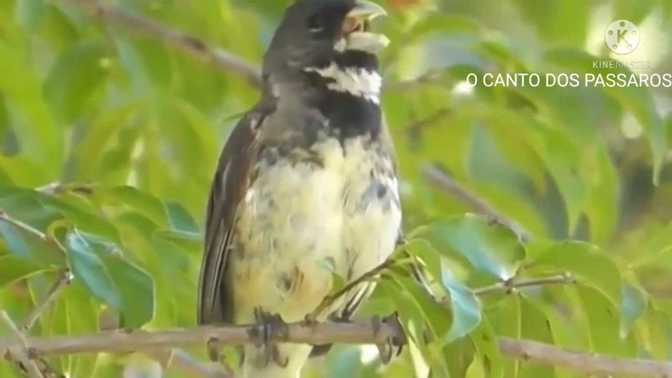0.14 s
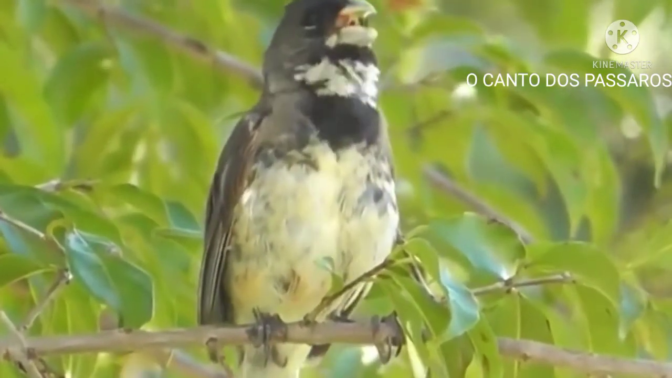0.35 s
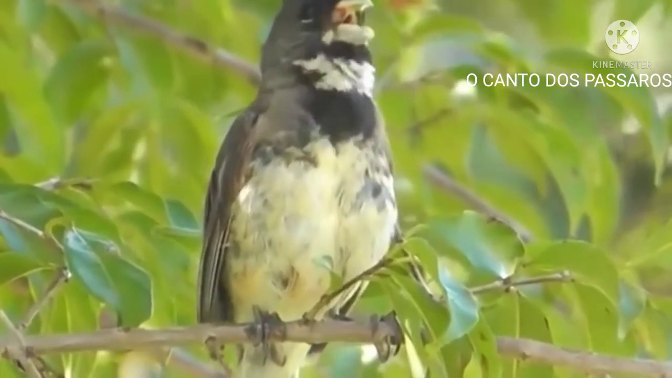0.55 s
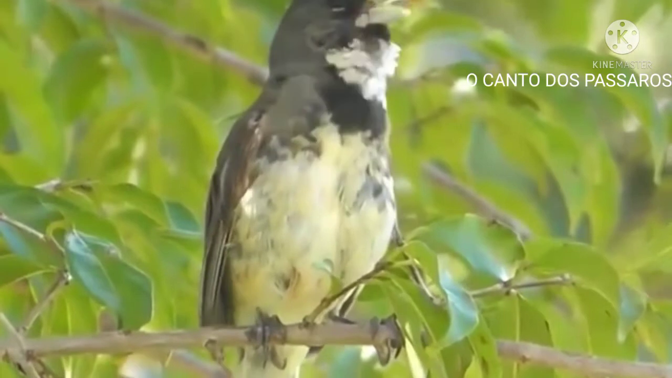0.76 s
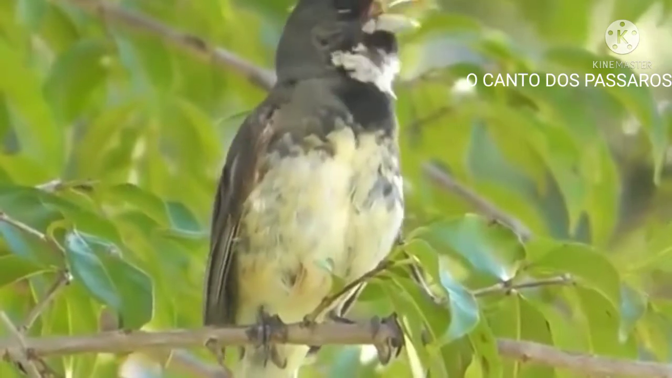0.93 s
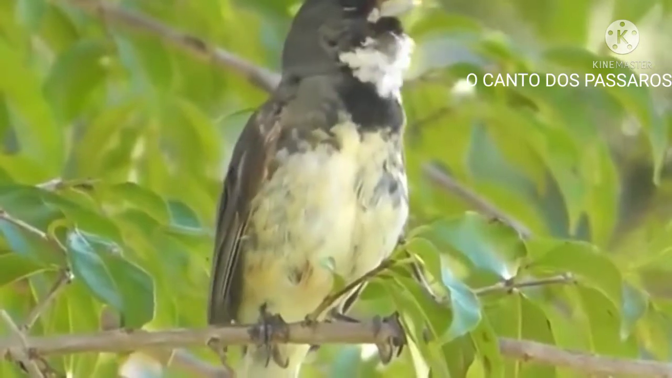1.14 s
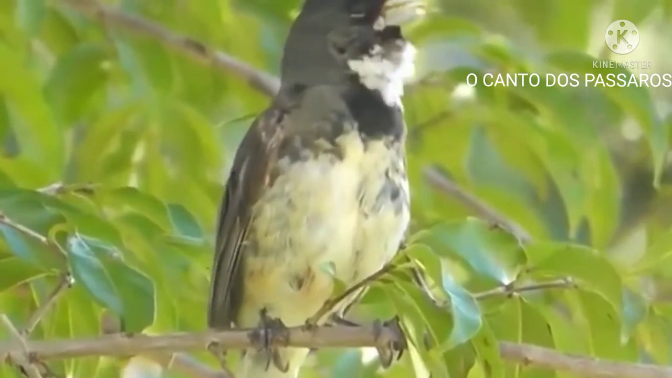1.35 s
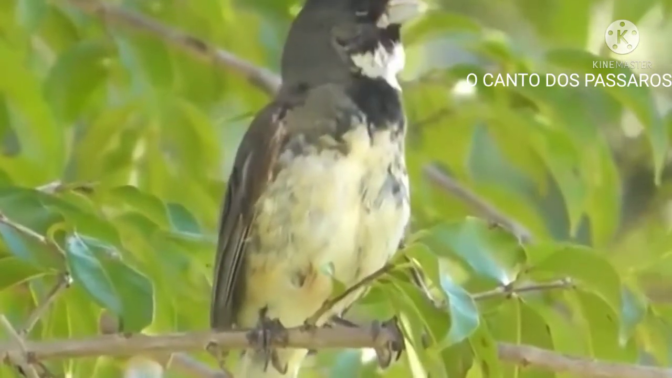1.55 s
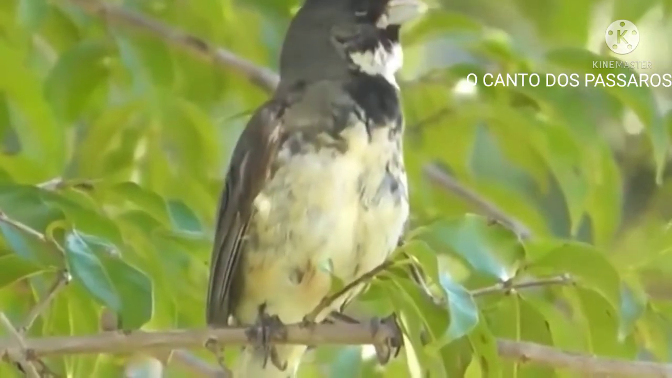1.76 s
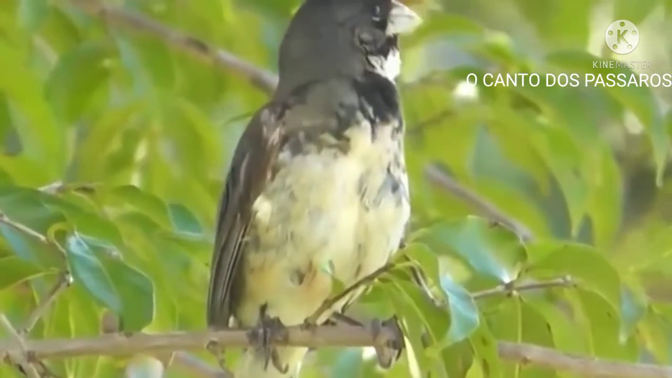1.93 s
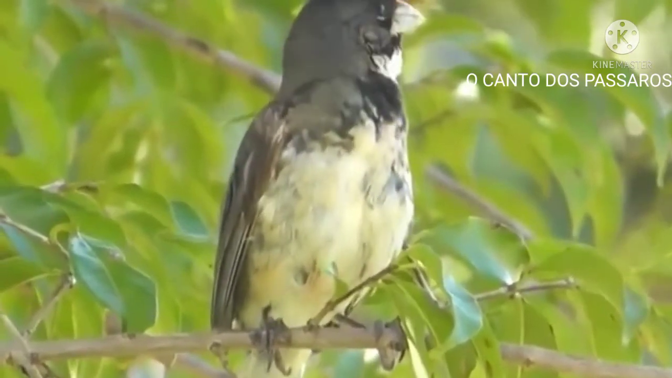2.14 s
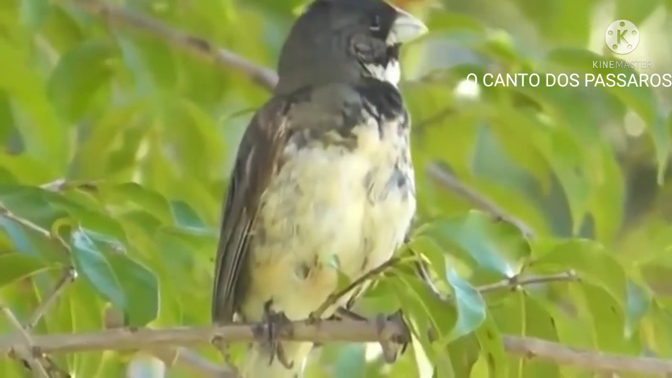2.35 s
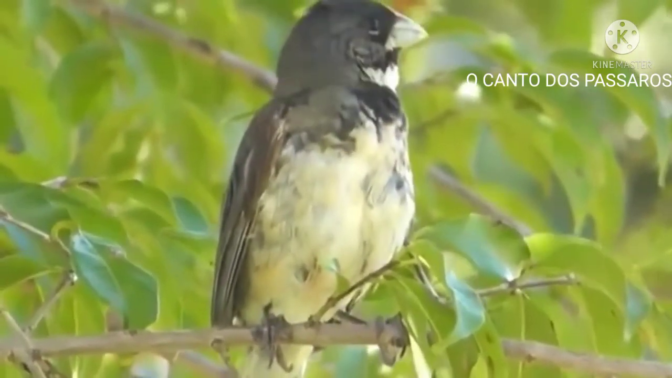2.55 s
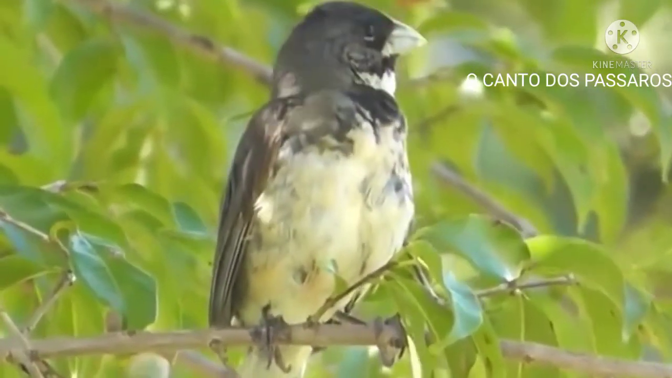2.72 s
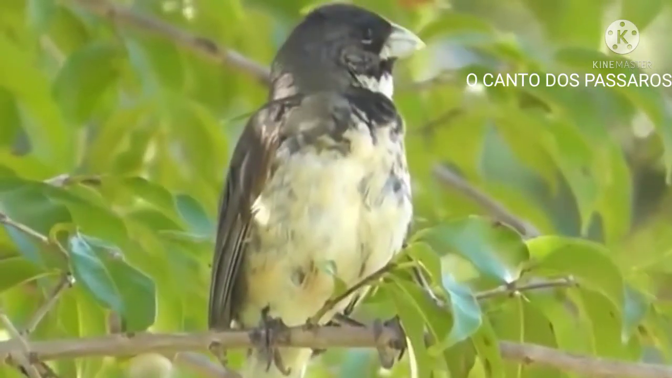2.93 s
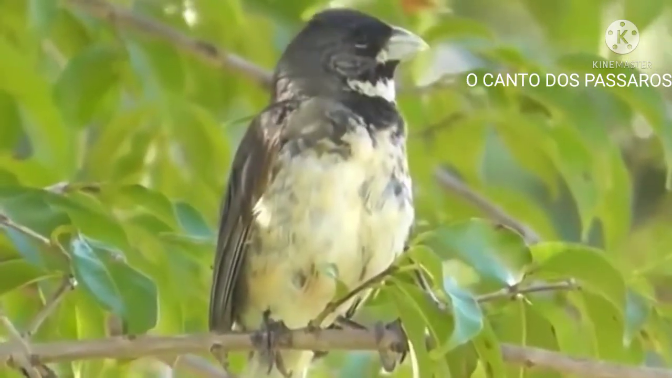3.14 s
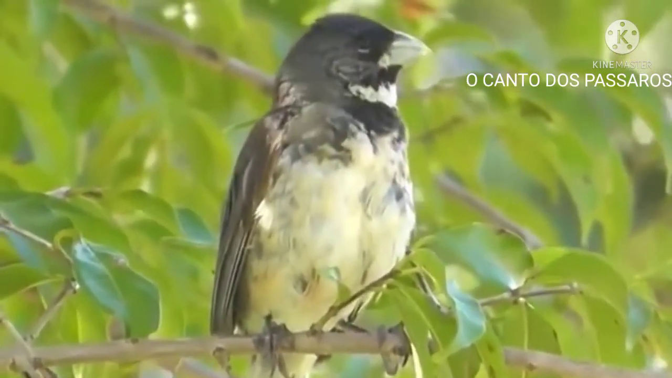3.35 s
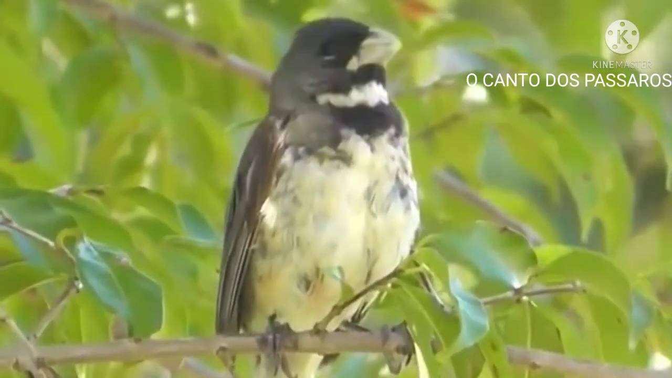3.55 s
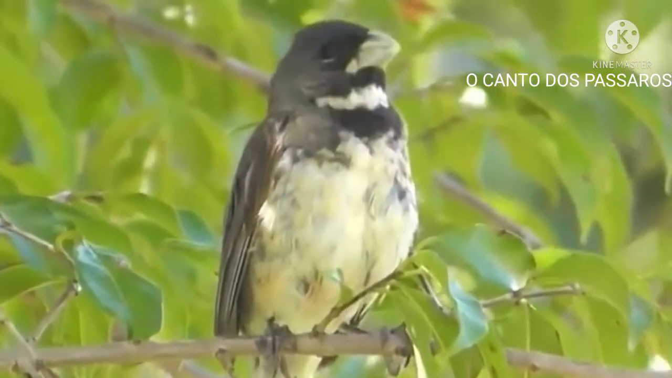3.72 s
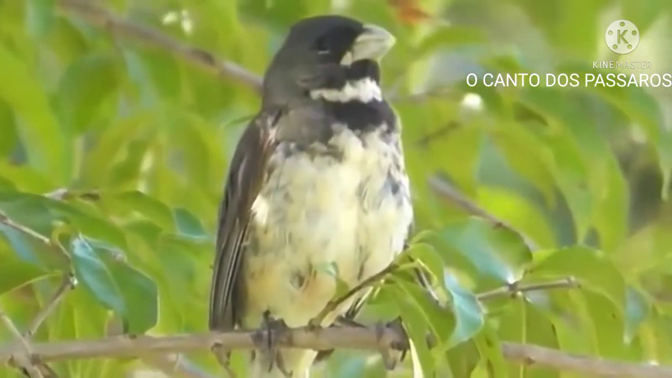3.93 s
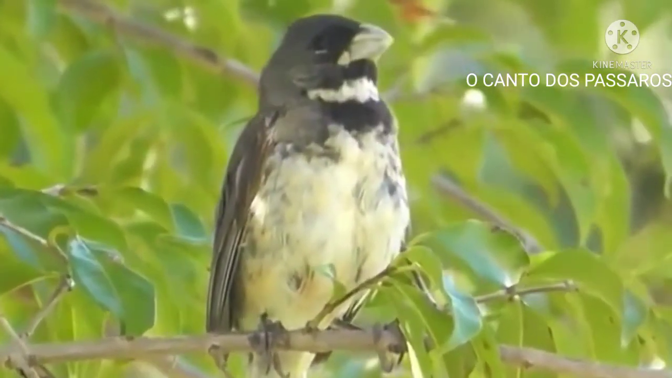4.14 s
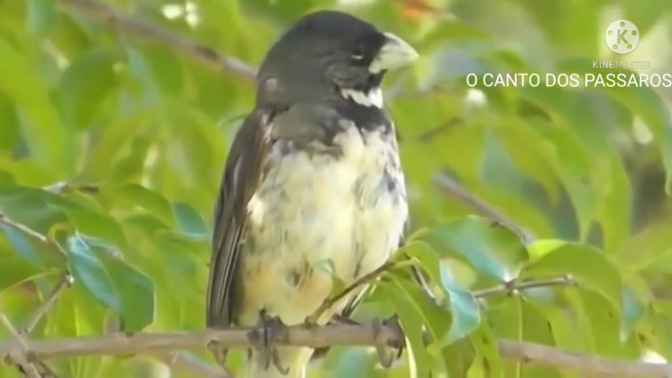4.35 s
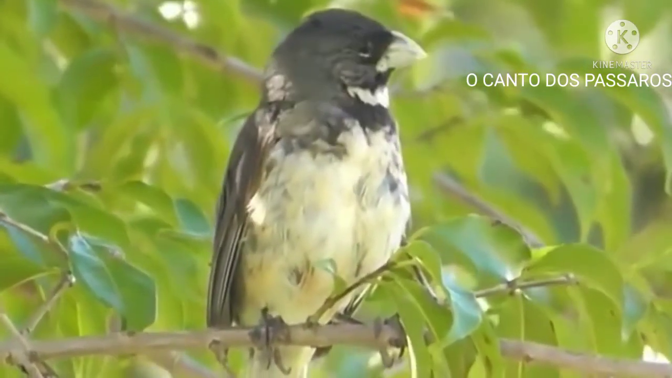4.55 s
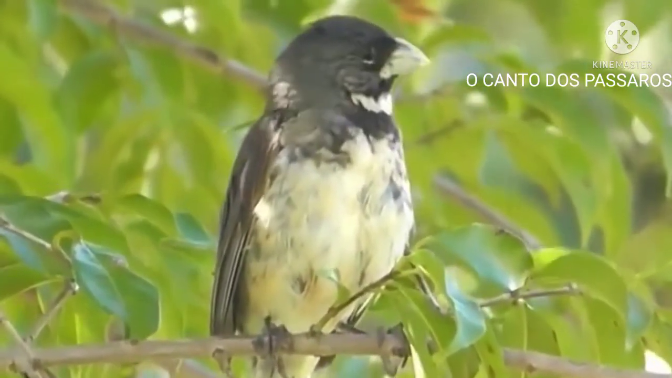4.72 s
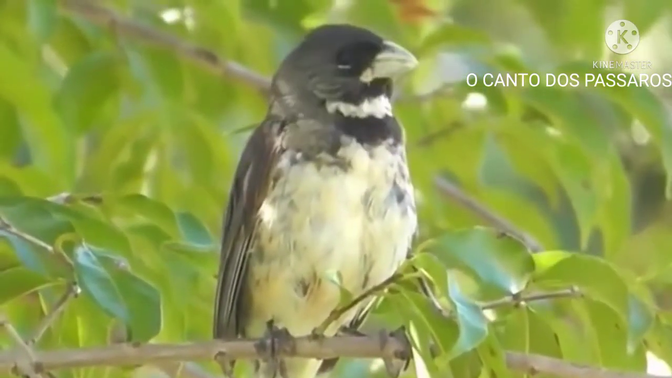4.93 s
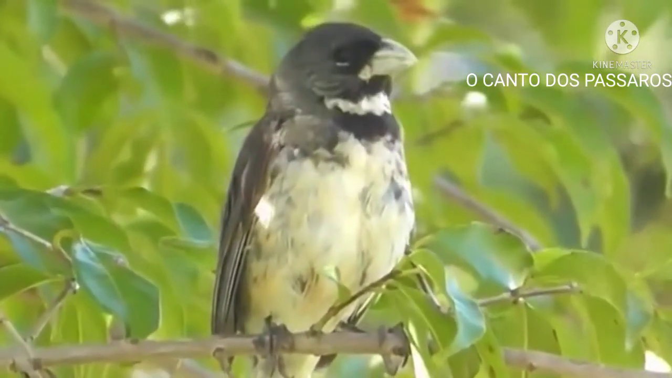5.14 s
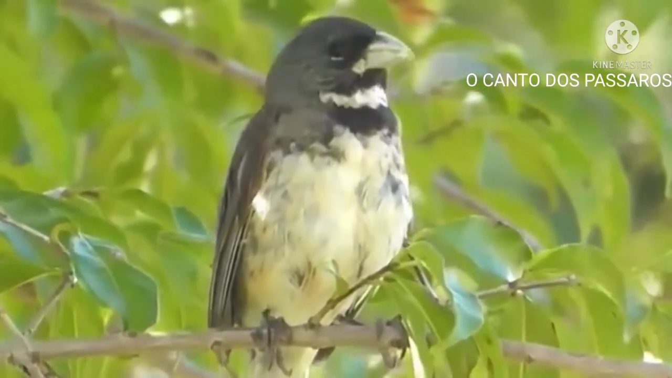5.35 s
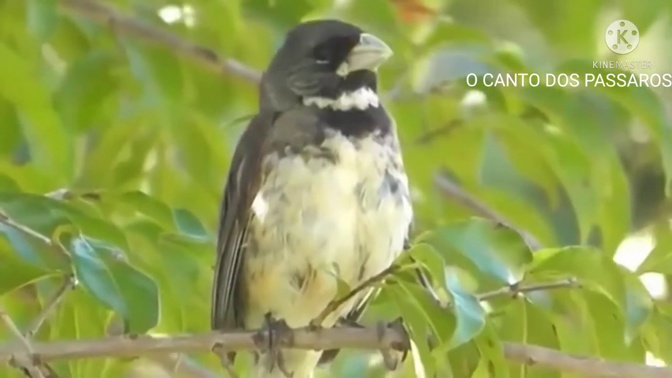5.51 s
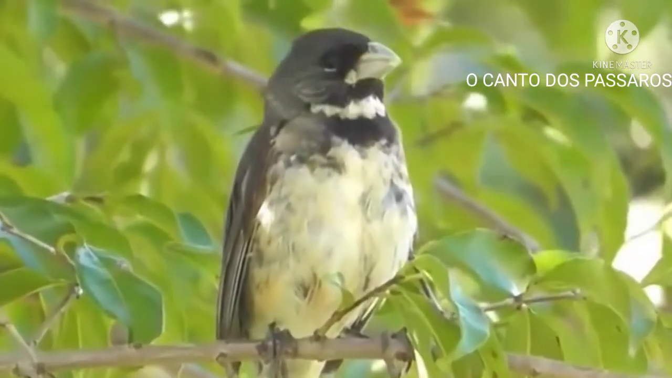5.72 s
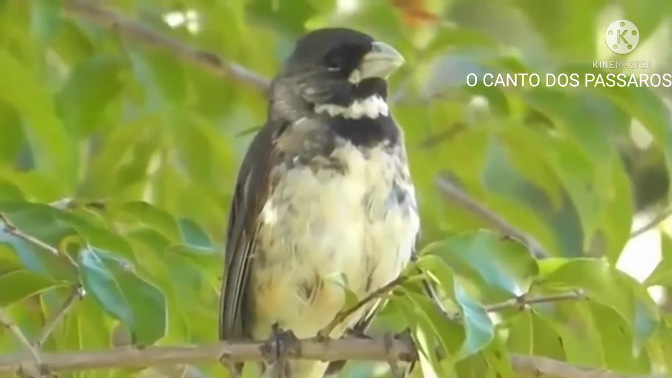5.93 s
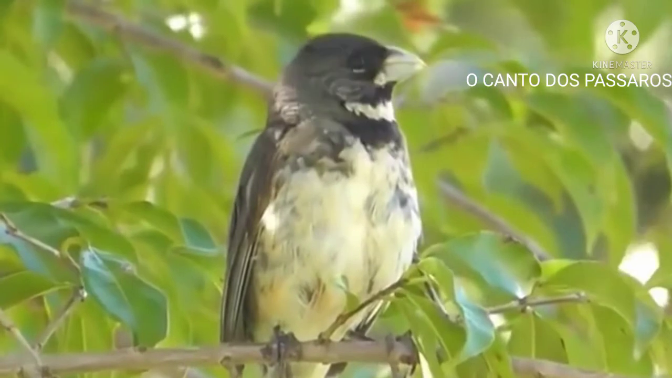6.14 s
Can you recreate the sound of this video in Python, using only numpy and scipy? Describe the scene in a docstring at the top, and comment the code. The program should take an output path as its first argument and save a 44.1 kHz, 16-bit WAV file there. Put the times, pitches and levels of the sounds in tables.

```python
"""A small finch close to the microphone ends a song phrase of gliding whistles and short buzzes, loud enough to
overload the recorder. The whistles are near sines; the buzzes are tones shaken in level and phase. Other birds
whistle, rasp and chirp farther off in the same ways, and one swoops down with its octave; hoarse haze also
lingers after some of the near notes. Leaves and distant traffic hiss and rumble, and wind gusts rumble on the
microphone: all shaped noise."""
import sys
import numpy as np
from scipy import signal
from scipy.fft import rfft, irfft
from scipy.io import wavfile
from scipy.ndimage import uniform_filter1d

SR = 44100
rng = np.random.default_rng(int(sys.argv[2]) if len(sys.argv) > 2 else 0)


def dump(signal):
    """Clip the signal to [-1, 1] and save it as 16-bit WAV at the path in sys.argv[1]."""
    limited = np.clip(np.atleast_2d(signal).T, -1, 1)
    pcm = np.round(limited * 32767).astype(np.int16)
    wavfile.write(sys.argv[1], SR, pcm)


N = 276948  # length [samples]

# Whistled notes of the near bird: (start [s], length [ms], pitch at start, quarter, middle, three quarters
# and end [Hz each], level at the start [dB], change over the note [dB], attack [ms], release [ms])
NEAR_NOTES = [(0, 72.3, 5030, 4770, 4648, 4615, 4580, -2.5, -0.5, 0.067, 12),
              (0.072, 53, 2240, 2625, 3360, 3900, 4500, -47.5, 20.5, 3.9, 3),
              (0.12, 30, 5300, 5660, 5630, 5670, 5840, -26, -2.5, 2.5, 3),
              (0.13, 74, 3550, 3785, 4034, 4370, 4730, 6.5, -15, 40, 4),
              (0.19, 90.6, 4665, 4840, 4717, 4640, 4720, -6, 6.5, 8, 7),
              (0.345, 126.5, 8130, 7590, 6590, 5660, 5260, -4, 3, 49.4, 6),
              (0.511, 30.3, 8000, 6770, 6400, 6200, 5750, -1, -13, 7.1, 4),
              (0.532, 110.6, 5680, 5066, 4758, 4452, 4260, -7, 4, 18, 13),
              (0.644, 62, 5660, 6080, 6300, 6940, 6800, -11.5, 6, 6, 11),
              (0.75, 184.5, 8370, 5660, 4700, 4203, 3990, -4, 1.5, 21, 22),
              (0.99, 42, 4140, 4100, 4320, 4400, 4700, -19, -17, 11, 3),
              (1.0, 38, 2000, 2110, 2330, 2430, 2470, -40, 13.5, 4, 8),
              (1.03, 22, 3980, 4090, 4500, 4580, 4600, -14, 4, 7, 2),
              (1.046, 76, 4010, 3830, 3390, 3060, 2600, -1.5, -21, 8, 14),
              (1.154, 22.6, 4900, 5160, 5200, 4530, 4200, -14.5, 9.5, 7, 6),
              (1.178, 55.6, 4950, 5800, 6006, 6120, 6020, -1.5, -5, 5.3, 20),
              (1.251, 80, 3940, 3707, 3275, 2955, 2600, -3, -20, 3.2, 13),
              (1.368, 13.5, 5380, 5740, 5370, 5200, 4850, -4, -19, 4.1, 2),
              (1.4, 22, 2510, 3090, 3440, 3640, 3900, -10, -5.5, 10.3, 5),
              (1.421, 47.3, 2970, 3130, 2974, 2980, 2830, -18, 4.5, 5.9, 6),
              (1.462, 34.4, 4270, 4140, 4164, 3840, 3270, -7, -5, 18, 4),
              (1.534, 15, 5330, 5700, 5780, 6100, 6100, -7.5, -16, 2.9, 2),
              (1.549, 15.4, 5180, 5500, 5800, 5950, 5900, -4.5, -11.5, 3.8, 2),
              (1.561, 21, 4900, 5250, 5284, 5380, 5120, -7, -1, 1.9, 2),
              (1.594, 104.2, 2693, 3080, 3556, 4090, 4393, 5, -14, 83, 9),
              (1.682, 48.3, 4000, 3520, 3390, 3310, 3280, -12, -7, 2.9, 7)]
# Whistled notes of birds farther off, same columns
FAR_NOTES = [(2.14, 160, 5670, 5180, 5100, 5110, 5130, -38, -8, 24, 30),
             (2.41, 66, 4700, 4520, 4400, 4406, 4360, -36.5, 14.5, 6.4, 23),
             (2.57, 52, 4140, 4190, 4150, 4130, 4080, -44.5, 4, 12, 12),
             (2.665, 53, 4280, 4390, 4360, 4340, 4260, -41, 17.5, 8, 13),
             (2.8, 18, 4700, 4660, 4570, 4250, 4150, -33.5, -4, 6.4, 2.7),
             (2.835, 45, 7250, 7140, 7100, 7100, 7050, -44, 0, 13, 15),
             (2.847, 18.7, 6720, 6150, 5700, 5510, 5330, -11, -13, 7, 3),
             (2.905, 20, 6540, 6100, 5660, 5400, 5350, -36.5, 5, 3, 4),
             (2.925, 25, 6100, 5650, 5360, 5400, 5330, -31, -12, 2.6, 3.5),
             (3.995, 105, 6050, 5550, 5100, 4630, 4250, -42.5, 5, 11, 15),
             (4.379, 10.4, 5900, 5860, 5780, 5800, 5750, -24, -4, 3, 2),
             (4.387, 70, 4920, 3650, 3350, 2970, 2500, -32, -16, 3, 5.3),
             (4.43, 46, 6100, 5800, 5600, 5320, 5190, -29, -15, 7.6, 5)]
# Buzzy notes of the near bird: (start [s], length [ms], loudest point [share 0-1],
# first pitch [Hz], last pitch [Hz], spread [Hz], level [dB])
NEAR_BUZZES = [(0.118, 15, .7, 5100, 4500, 300, -26), (0.18, 26, 0.3, 4840, 4710, 352, -12),
               (0.53, 16, .7, 6300, 6000, 550, -18), (0.627, 25, 0.26, 5200, 5220, 453, -17.5),
               (1.212, 46.6, 0.87, 4205, 4620, 472, -8), (1.372, 33.7, 0, 5000, 4300, 664, -13),
               (1.576, 36, 0, 5200, 5320, 493, -10)]
# Hoarse, hazy sounds farther off: some calls, some smears lingering after near notes; same columns
FAR_HAZE = [(0.345, 64.5, 0.72, 3750, 3820, 150, -31), (1.235, 46, 0.32, 7330, 6500, 447, -26.5),
            (1.345, 45, 0.49, 7000, 6900, 567, -33), (2.862, 90, .1, 5800, 5900, 605, -36),
            (2.865, 95.5, 0.17, 2104, 2100, 180, -39), (2.96, 70, .6, 6130, 5400, 350, -42),
            (3.005, 47.2, .5, 6900, 6000, 900, -31.5), (3.1, 85.6, 0.62, 3840, 4060, 520, -34.5),
            (3.13, 54.6, 0.32, 5300, 6700, 500, -34), (4.03, 110, 0.63, 5420, 4290, 400, -38.5),
            (4.372, 67.8, 0.14, 5886, 4830, 2530, -31), (4.382, 50.5, 0.12, 7830, 6440, 360, -31),
            (4.39, 39.8, .6, 5580, 4880, 500, -33), (4.15, 308, 0.58, 2697, 2707, 800, -42.5),
            (5.01, 167, 0.14, 6770, 6440, 330, -47)]
# Leaf and traffic hiss over time: (time [s], level [dB], level of the treble [dB])
HISS_LEVELS = [(0.0, -36, -36), (0.35, -39.5, -35.5), (0.61, -46, -46.5), (1.12, -44.5, -38.5),
               (1.78, -44, -42.5), (2.1, -42.5, -43.5), (2.7, -42.5, -43.5), (2.97, -41, -39.5),
               (3.4, -41, -42), (4.3, -42, -41.5), (4.7, -43, -44.5), (5.1, -42.5, -43), (5.33, -47, -46),
               (5.7, -45.5, -46.5), (5.85, -48, -50), (6.28, -49, -53.5)]
# Wind on the microphone over time: (time [s], level [dB])
WIND_LEVELS = [(0.0, -32), (0.02, -46.5), (0.91, -55.5), (2.46, -42), (3.34, -48.5), (3.97, -48.5),
               (4.0, -41), (4.58, -53), (4.65, -44.5), (4.84, -51.5), (5.14, -47.5), (5.27, -61),
               (5.33, -36), (5.4, -30.5), (5.75, -48), (5.91, -32), (6.03, -49), (6.05, -36.5),
               (6.21, -31.5), (6.28, -43)]
# Tone colours of hiss, its treble, wind and far traffic: (frequency [Hz], relative strength [dB per Hz])
HISS_SPECTRUM = [(290, -20.5), (500, -11), (562, -5.5), (732, -8), (875, -14.5), (1110, -0.5), (1390, 2),
                 (1840, -2.5), (2010, 0.5), (3010, -20.5), (3200, -48), (4160, -62), (7040, -120)]
TREBLE_SPECTRUM = [(1530, -10), (2600, 0.5), (3020, 1), (3630, 2.5), (4370, 4.5), (4890, 0), (5460, -1.5),
                   (6110, -2), (6610, 3), (7590, -6), (7890, -8), (9060, -8), (10800, -26), (12500, -23),
                   (16200, -67), (22000, -120)]
WIND_SPECTRUM = [(15, -67), (25, -40), (43, -34), (158, -3.5), (189, -1.5), (335, -7), (509, -14),
                 (697, -40), (900, -48.5), (1170, -70), (1980, -120)]
RUMBLE_SPECTRUM = [(15, -44.5), (25, -12.5), (43, -28.5), (105, 2.5), (172, -3), (366, -5), (599, 5),
                   (800, -9.5), (1040, -37), (1760, -120)]
# Strong single reflections: (delay [s], level [dB])
REFLECTIONS = [(.0045, -13.5), (.011, -16), (.023, -26), (.041, -27.5), (.1, -42), (.14, -36.5)]
# Brief catches in the near whistles: (time [s], depth [dB], negative where it gets louder, width [ms])
NEAR_CATCHES = [(0.054, 10, 7.7), (0.2656, 4, 2.5), (0.4234, 16, 2.2), (0.4344, 7, 0.92), (0.5963, -5, 1.2),
                (0.661, 9.5, 3.2), (0.68, 11, 0.78), (0.7762, 9.5, 0.74), (0.786, 20.5, .8),
                (0.811, 9, 1.3), (0.8273, 11, 0.88), (0.926, -13, 4.7), (1.0756, -2, 3.5), (1.198, 10, 3.5),
                (1.217, 13, 3), (1.2748, 3, 3.6), (1.4412, 7, 6), (1.485, 16, 2.4), (1.668, 7, 2.5)]
# A swooping whistle farther off: (time [s], pitch [Hz], level [dB], octave level [dB])
SWOOP_CURVE = [(5.428, 5210, -48, -75), (5.44, 4500, -29.5, -40.5), (5.455, 3600, -37, -32),
               (5.47, 2890, -51, -28), (5.485, 2470, -46, -32.5), (5.497, 2400, -54, -35),
               (5.51, 2253, -51, -22), (5.55, 2212, -50, -27), (5.568, 2230, -56, -48)]

# Smaller catches come at random on fast glides; closer ones add up.
CATCH_DB, CATCH_HALF_LENGTH_MS = 4.5, .9
CATCHES_PER_KHZ, FAST_GLIDE_KHZ_PER_S = 1.8, 29  # number per kHz of glide, reached at this speed
RUMBLE_DB = -52.5
CHIRP_MS, CHIRP_FIRST_HZ, CHIRP_LAST_HZ, CHIRP_SPREAD_HZ = 36, 4500, 2700, 200
CHIRPS_START_S, CHIRP_EVERY_S, CHIRP_COUNT = 4.75, .0795, 8
FIRST_CHIRP_DB, CHIRP_FADE_DB = -43.5, .9  # each chirp is softer than the last by the fade
# Tail level against the direct sound, and time for its early part to fall 60 dB
NEAR_TAIL_DB, NEAR_T60_S = -19, .12
FAR_TAIL_DB, FAR_T60_S = -12, .17
LATE_TAIL_DB, LATE_T60_S = -16, .73  # slower late scatter, level against the early part
OVERLOAD, KNEE = .69, 12  # ceiling as a share of full scale; a higher knee bends more sharply
CUTOFF_HZ = 15780


def from_db(db):
    """Turn decibels into a multiplier."""
    return 10 ** (np.asarray(db) / 20)


def rms_one(x):
    """Scale to an average (rms) strength of 1."""
    return x / np.sqrt(np.mean(x ** 2) + 1e-20)


def in_time(rows):
    """Draw each column as a curve with one value per sample."""
    s, *columns = np.transpose(rows)
    return [np.interp(np.arange(N) / SR, s, column) for column in columns]


def drift(rate_hz):
    """Random wandering with rms 1: noise smoothed twice by a one-pole low-pass."""
    r = np.exp(-2 * np.pi * rate_hz / SR)
    noise = rng.standard_normal(N + SR)
    return rms_one(signal.lfilter([1], [1, -2 * r, r * r], noise)[SR:])  # skip the settling second


def coloured_noise(spectrum, patchy_db, patch_hz):
    """Noise with a given spectrum, in five bands that swell and sink partly together; rms 1."""
    hz = np.maximum(np.arange(N // 2 + 1) * SR / N, 1)
    point_hz, point_db = np.transpose(spectrum)
    colour_db = np.interp(np.log(hz), np.log(point_hz), point_db, -90, -90)
    shaped = rfft(rng.standard_normal(N)) * from_db(colour_db)
    edges = np.geomspace(point_hz[0], point_hz[-1], 6)
    together = drift(patch_hz)
    total = np.zeros(N)
    for low, high in zip(edges, edges[1:]):
        band = irfft(shaped * (hz >= low) * (hz < high), N)
        total += band * from_db(patchy_db * (together + drift(patch_hz)))
    return rms_one(total)


def sample_range(start, length_ms):
    """Sample numbers covered by one note."""
    return np.arange(round(start * SR), round((start + length_ms / 1000) * SR))


def note_curve(start, length_ms, *rest):
    """Pitch and height of one note: a smooth glide through five pitches under attack, slope and release."""
    *hz, level_db, change_db, attack_ms, release_ms = rest
    i = sample_range(start, length_ms)
    share = np.linspace(0, 1, len(i))
    corners = np.interp(share, np.linspace(0, 1, len(hz)), hz)
    pitch = uniform_filter1d(corners, size=len(i) // 6, mode="nearest")
    attack = np.clip(share * length_ms / max(attack_ms, .1), 0, 1)
    release = np.clip((1 - share) * length_ms / max(release_ms, 1), 0, 1)
    return i, pitch, from_db(level_db + change_db * share) * (attack * release) ** 2


def whistles(notes, waver_db, waver_hz):
    """Each note is a near sine that follows its pitch and level, wavering and catching on fast glides."""
    out, waver, jitter, chance = np.zeros(N), drift(120), drift(202), rng.random(N)
    dip = signal.windows.hann(round(2 * CATCH_HALF_LENGTH_MS * SR / 1000))
    for note in notes:
        i, pitch, height = note_curve(*note)
        glide_khz = np.abs(np.gradient(pitch)) / 1000  # pitch change per sample
        speed_share = np.minimum(glide_khz * SR / FAST_GLIDE_KHZ_PER_S, 1)
        caught = chance[i] < CATCHES_PER_KHZ * glide_khz * speed_share
        shake_db = waver_db * waver[i] - CATCH_DB * np.convolve(caught, dip, "same")
        turns = np.cumsum(pitch + waver_hz * jitter[i]) / SR + rng.random()
        out[i] += np.sqrt(2) * height * from_db(shake_db) * np.sin(2 * np.pi * turns)
    return out


def catches():
    """Gain that dips for a few milliseconds, or at some points rises, in a smooth bell shape."""
    t, gain_db = np.arange(N) / SR, np.zeros(N)
    for s, depth_db, width_ms in NEAR_CATCHES:
        i = slice(round((s - .01) * SR), round((s + .01) * SR))
        gain_db[i] -= depth_db * np.exp(-.5 * ((t[i] - s) / (width_ms / 2000)) ** 2)
    return from_db(gain_db)


def leaf_and_traffic_hiss():
    """Two layers of patchy noise, a main hiss and its treble, each with its own level over time."""
    hiss_db, treble_db = in_time(HISS_LEVELS)
    hiss = from_db(hiss_db) * coloured_noise(HISS_SPECTRUM, patchy_db=.79, patch_hz=14)
    treble = from_db(treble_db) * coloured_noise(TREBLE_SPECTRUM, patchy_db=.5, patch_hz=4)
    return hiss + treble


def wind_on_microphone():
    """Gusts rumble on the microphone: low patchy noise that swells and sinks."""
    return from_db(in_time(WIND_LEVELS)[0]) * coloured_noise(WIND_SPECTRUM, patchy_db=1.9, patch_hz=6.5)


def far_traffic():
    """Distant traffic as low patchy noise at one overall level."""
    return from_db(RUMBLE_DB) * coloured_noise(RUMBLE_SPECTRUM, patchy_db=2.5, patch_hz=8)


def buzzes(calls, steady_share, roundness=1):
    """A gliding tone shaken quickly at random in level and phase, which spreads it over a band."""
    out = np.zeros(N)
    for start, length_ms, loudest, first_hz, last_hz, spread_hz, level_db in calls:
        i = sample_range(start, length_ms)
        low_pass = signal.butter(4, spread_hz, fs=SR, output="sos")
        shake = signal.sosfilt(low_pass, rng.standard_normal((2, SR // 2)))
        shake = rms_one(shake[:, 2000:2000 + len(i)])  # skip the filter's settling
        phase = 2 * np.pi * np.cumsum(np.linspace(first_hz, last_hz, len(i))) / SR
        peak = np.clip(loudest, .05, .95)
        arch = np.interp(np.linspace(0, 1, len(i)), [0, peak, 1], [0, np.pi / 2, np.pi])
        shape = np.abs(np.sin(arch)) ** roundness
        tone = (steady_share + shake[0]) * np.sin(phase) + shake[1] * np.cos(phase)
        out[i] += from_db(level_db) * shape * rms_one(tone)
    return out


def far_chirps():
    """An even row of falling buzzy chirps, each a little softer."""
    calls = []
    for k in range(CHIRP_COUNT):
        start, level_db = CHIRPS_START_S + k * CHIRP_EVERY_S, FIRST_CHIRP_DB - k * CHIRP_FADE_DB
        calls.append((start, CHIRP_MS, .5, CHIRP_FIRST_HZ, CHIRP_LAST_HZ, CHIRP_SPREAD_HZ, level_db))
    return buzzes(calls, steady_share=.84)


def swoop():
    """A falling whistle that levels out: a sine and its octave, which becomes the stronger of the two."""
    hz, level_db, octave_db = in_time(SWOOP_CURVE)
    t, phase = np.arange(N) / SR, 2 * np.pi * np.cumsum(hz) / SR
    on = 1. * (t > SWOOP_CURVE[0][0]) * (t < SWOOP_CURVE[-1][0])
    sounding = uniform_filter1d(on, size=100)  # soften both ends
    tones = from_db(level_db) * np.sin(phase) + from_db(octave_db) * np.sin(2 * phase)
    return np.sqrt(2) * sounding * tones


def among_trees(x, tail_db, t60):
    """Direct sound, single reflections and a diffuse tail scattered back by leaves and trunks."""
    t = np.arange(SR) / SR
    decay = from_db(-60 * t / t60) + from_db(LATE_TAIL_DB - 60 * t / LATE_T60_S)
    tail = rng.standard_normal(SR) * decay * np.clip(t / .00578, 0, 1)  # builds up over 5.78 ms
    response = from_db(tail_db) * tail / np.sqrt(np.sum(tail ** 2))
    response[0] = 1  # direct sound
    for delay, level_db in REFLECTIONS:
        response[round(delay * SR)] += from_db(level_db)
    return signal.fftconvolve(x, response)[:N]


def scene():
    """Near bird and far birds among trees, with hiss, wind and traffic rumble."""
    near = catches() * whistles(NEAR_NOTES, waver_db=1.4, waver_hz=25.3)
    near += buzzes(NEAR_BUZZES, steady_share=.8, roundness=.65)
    far = buzzes(FAR_HAZE, steady_share=.45, roundness=1.16)
    far += whistles(FAR_NOTES, waver_db=1.7, waver_hz=18)
    far += far_chirps() + swoop()
    birds = among_trees(near, NEAR_TAIL_DB, NEAR_T60_S) + among_trees(far, FAR_TAIL_DB, FAR_T60_S)
    return (birds + leaf_and_traffic_hiss() + wind_on_microphone() + far_traffic())[None]


def record(dry):
    """The input stage flattens the loudest notes, adding odd overtones; the top is cut without phase shift."""
    clipped = dry / (1 + np.abs(dry / OVERLOAD) ** KNEE) ** (1 / KNEE)
    top_cut = signal.cheby2(16, 35, CUTOFF_HZ, fs=SR, output="sos")
    return signal.sosfiltfilt(top_cut, clipped)  # run forwards and backwards


dry = scene()
out = record(dry)
dump(out)
```